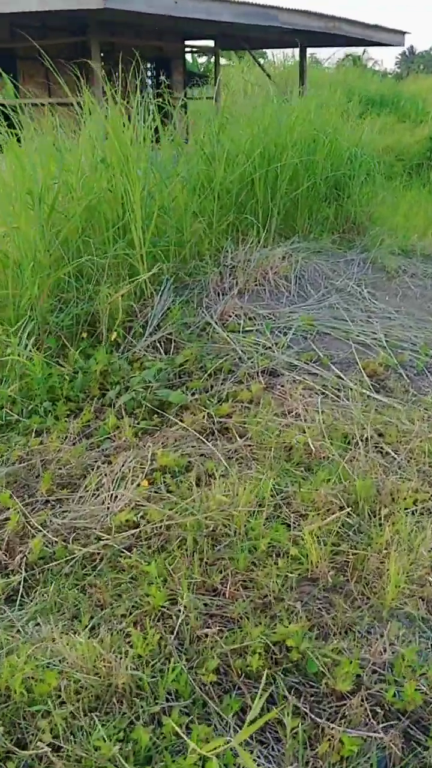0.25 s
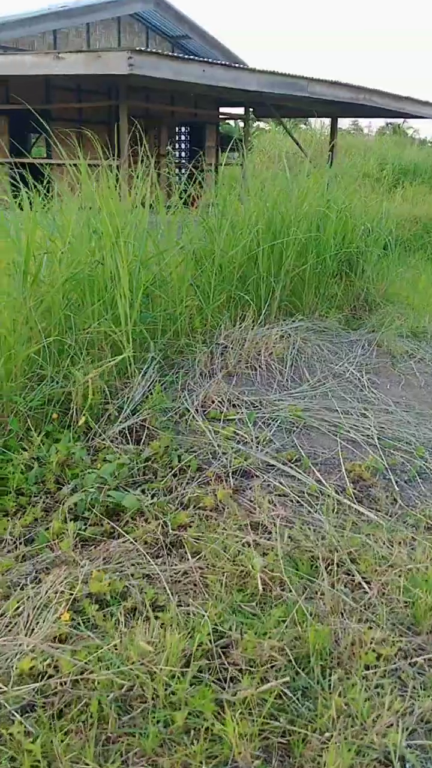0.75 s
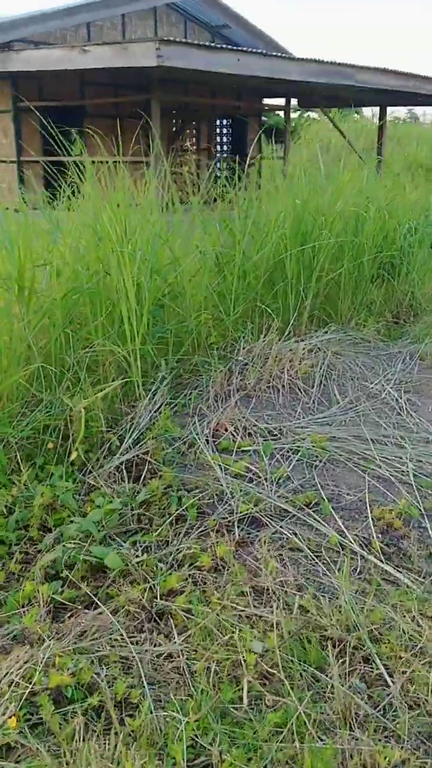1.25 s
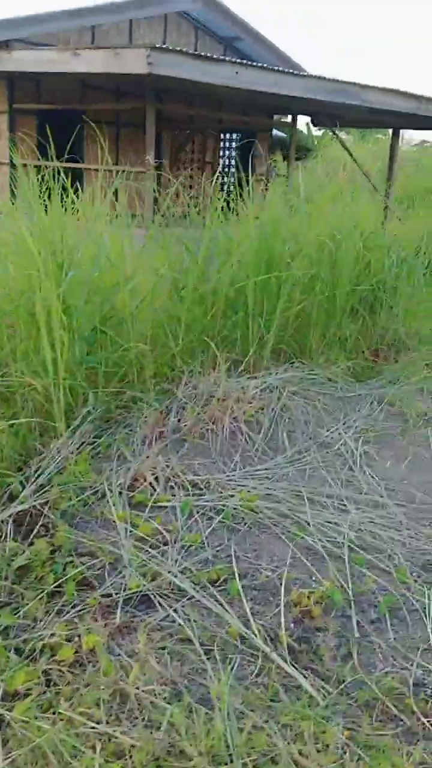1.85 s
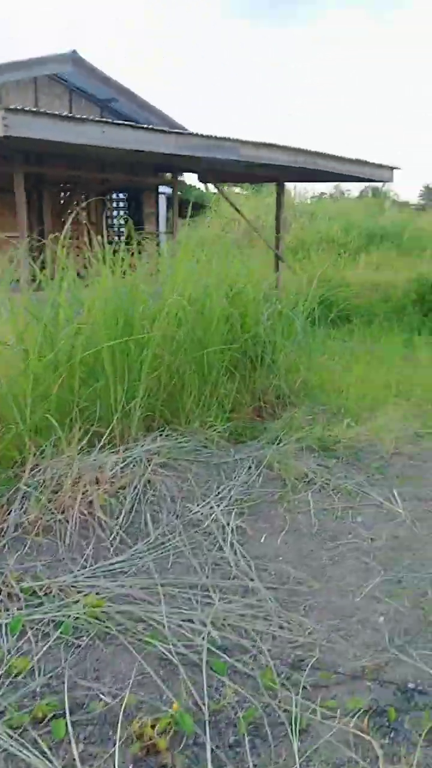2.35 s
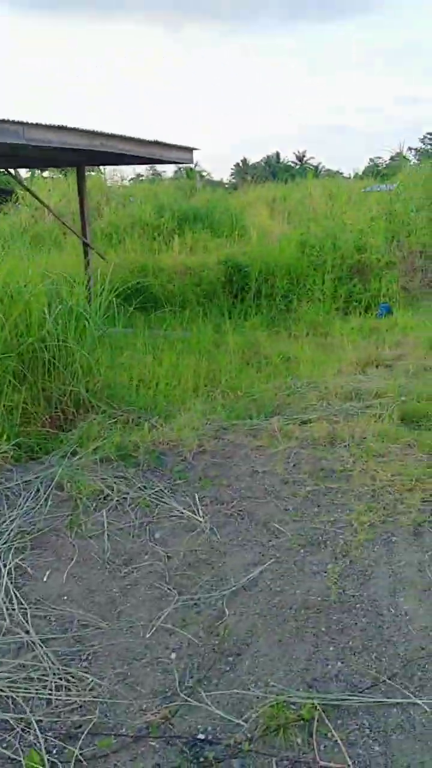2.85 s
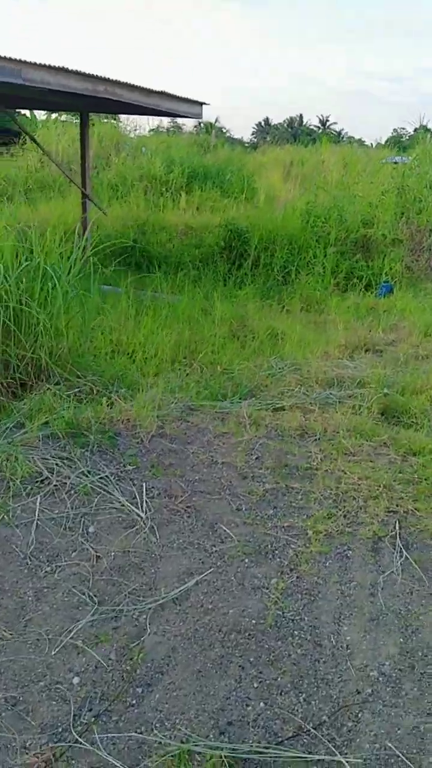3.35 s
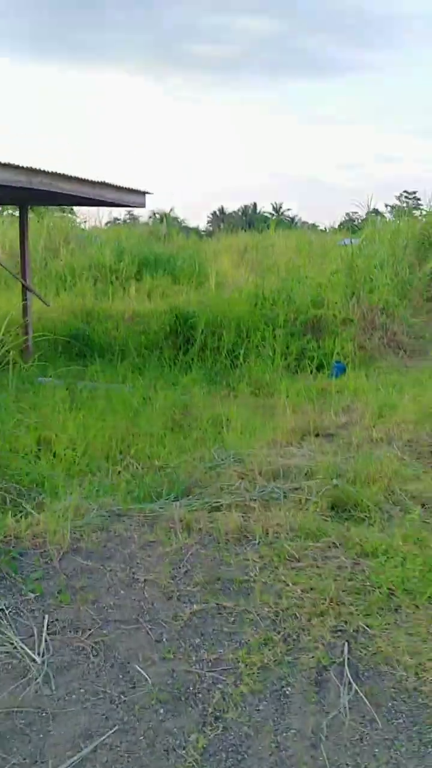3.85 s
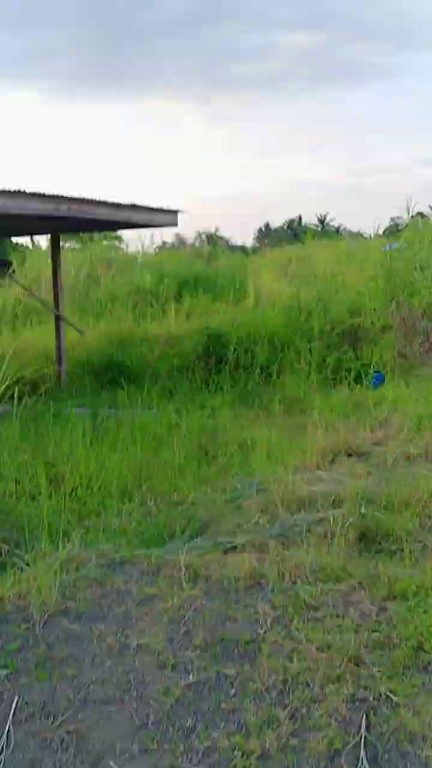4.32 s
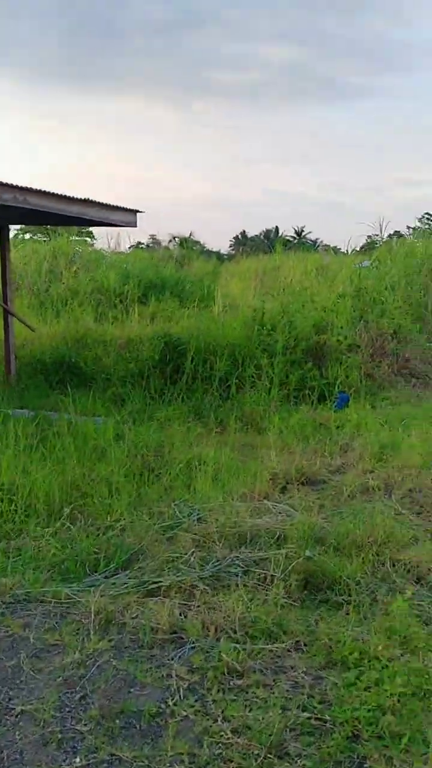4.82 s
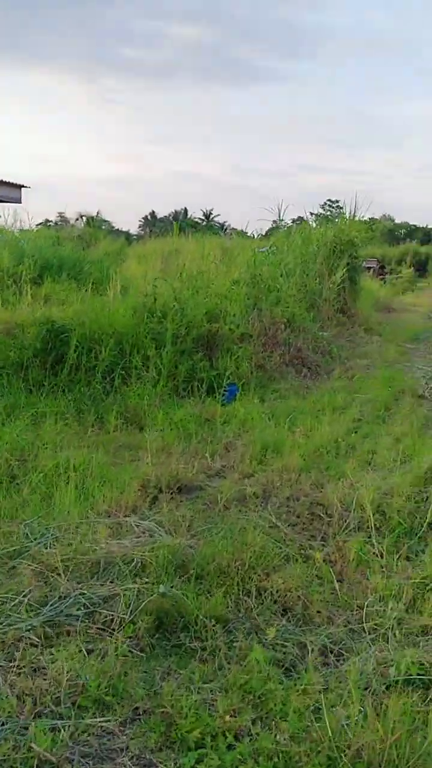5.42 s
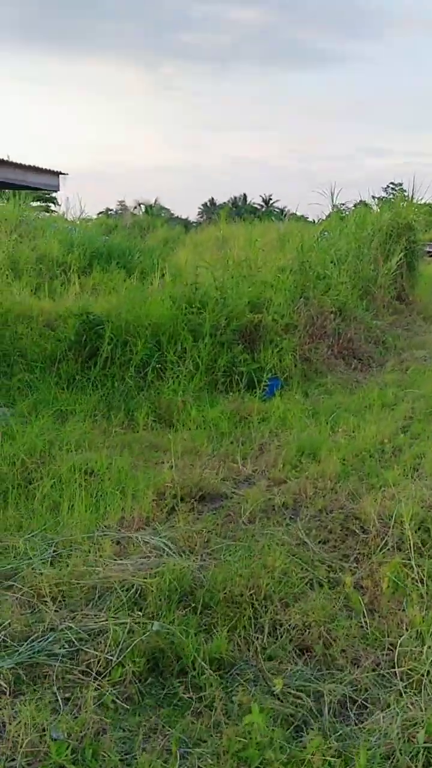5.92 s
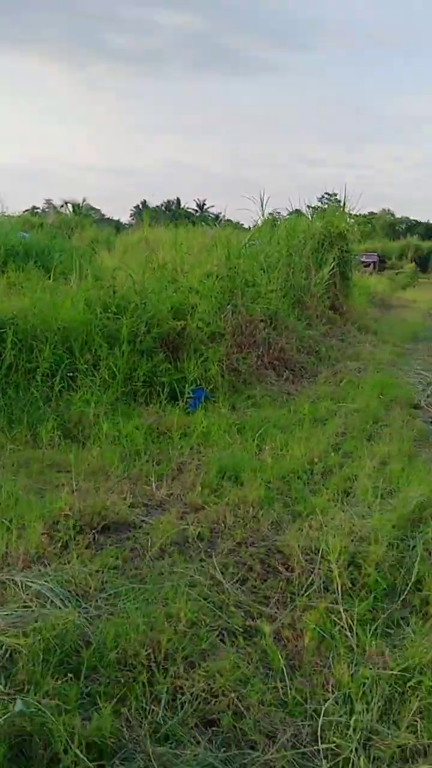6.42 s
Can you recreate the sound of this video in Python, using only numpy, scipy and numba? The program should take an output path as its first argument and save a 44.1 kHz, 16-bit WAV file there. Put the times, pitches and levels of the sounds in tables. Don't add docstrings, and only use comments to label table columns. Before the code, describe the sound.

A rural field heard through a handheld phone, with low uneven wind rumble, soft leaf hiss, high insect shimmer and a faint cricket trilling in bouts. Small birds whistle at the start. Around 0.9-1.2 s dry grass crunches and snaps, and a bright bird warble darts up and down. Far young roosters call from 1.1 to 1.9 s, with a fainter cry near 2.3. Steps crunch at 2.2 and 2.9; a heavy heel thuds at 3.1. From 3.5 to 5.1 s a near rooster crows loudly: rough rising start, shout, swelling cry, clear falling end. A deeper, farther rooster overlaps it, leaving a faint tail until about 6. Crunches at 3.7 and 4.3, another warble at 4.3, a thud at 4.75. A stick cracks sharply at 5.54, then light grass brushing and gliding whistles continue to the end at about 6.6 s.

```python
import sys
import numpy as np
from scipy import signal
from scipy.fft import rfft, irfft
from scipy.io import wavfile
from scipy.ndimage import uniform_filter1d
from numba import njit

SR = 44100
rng = np.random.default_rng(int(sys.argv[2]) if len(sys.argv) > 2 else 0)


def how_loud(loudness_db):
    steps = np.asarray(loudness_db, float) / 20
    return 10 ** steps


def dump_mix(stems):
    frames = np.atleast_2d(stems).T
    limited = np.clip(frames, -1, 1)
    pcm = np.round(limited * 32767).astype(np.int16)
    wavfile.write(sys.argv[1], SR, pcm)


N = 294147


@njit
def svf(x, hz, width):
    y, b, l = np.empty(len(x)), 0., 0.
    g, k = np.tan(np.pi * hz / SR), width / hz
    for i in range(len(x)):
        v = (b + g * (x[i] - l)) / (1 + g * (g + k))
        b, l, y[i] = 2 * v - b, l + 2 * g * v, k * v
    return y


def sharp_band(x, hz, width):
    return svf(svf(x, hz, width), hz, width)


def level(x, db):
    return x * how_loud(db) / np.sqrt(np.mean(x ** 2))


def walk(rate, size=N):
    k = int(SR / rate)
    held = np.repeat(rng.standard_normal(size // k + 1), k)
    return 1.114 * uniform_filter1d(uniform_filter1d(held, k), k)[:size]


def colour(x, tone):
    hz, db = np.transpose(tone)
    bins = np.arange(len(x) // 2 + 1) * SR / len(x) + 1
    return irfft(rfft(x) * how_loud(np.interp(np.log(bins), np.log(hz), db)), len(x))


def curve(table):
    return how_loud(np.interp(np.arange(N) / SR, *np.transpose(table)))


def add(out, start_s, x):
    i = max(int(start_s * SR), 0)
    out[i:i + len(x)] += x[:N - i]


def crow(syllables, tones_db, roughness, lowest):
    out = np.zeros(N)
    quaver, wobble, jitter = .034, .016, .026
    flutter_hz, rasp_db, breath_db, half_db = 80, -9, -15.5, -15
    for rows, tone_db, rough in zip(syllables, tones_db, roughness):
        s, *columns = np.transpose(rows)
        t = np.arange(s[0], s[-1], 1 / SR)
        size = len(t)
        hz, effort_db, *gape_db = (uniform_filter1d(np.interp(t, s, c), size=600) for c in columns)
        throb = np.sin(2 * np.pi * 39 * t + walk(12, size))
        unsteady = quaver * throb + wobble * walk(flutter_hz, size) + jitter * walk(500, size)
        phase = 2 * np.pi * np.cumsum(hz * (1 + rough * unsteady)) / SR
        upper_db = effort_db.max() + 0.65 * (effort_db - effort_db.max())
        breath = level(svf(rng.standard_normal(size), 3150, 900), 0)
        voice = rough * how_loud(upper_db + breath_db) * breath
        efforts_db = [effort_db - sum(gape_db), effort_db, upper_db, upper_db]
        for k, (db, part_db) in enumerate(zip(efforts_db, tone_db)):
            rasp = how_loud(rasp_db) * (lowest + k) * walk(700, size)
            shake = 0.8 * min(k, 1) * throb + 0.43 * walk(flutter_hz, size) + rasp
            flutter = (1 + rough * shake) / np.sqrt(1 + rough ** 2)
            voice = voice + np.sqrt(2) * how_loud(db + part_db) * flutter * np.sin((lowest + k) * phase)
        between = np.sin((lowest + .5) * phase) * .5 + np.sin((lowest + 1 + .5) * phase)
        voice = voice + rough * how_loud(upper_db + half_db) * between
        add(out, s[0], voice * np.clip(np.minimum(t - s[0], s[-1] - t) / 0.0013, 0, 1))
    return colour(out, [(520, -27), (720, 1), (3700, -3.0), (4700, -50)])


# t/s, f/Hz, effort level/dB, loss of the lowest tone by the open beak/dB
NEAR_CROW = [
    [(3.505, 676, -40.5, 3), (3.565, 830, -32, 4), (3.62, 881, -37, -2.5), (3.67, 812, -40.5, 4),
     (3.73, 777, -54, 20)],
    [(3.755, 804, -37.5, 3.5), (3.78, 990, -27.5, 3.5), (3.805, 995, -27, 1), (3.835, 967, -29.5, -0.5),
     (3.875, 765, -44, 4)],
    [(3.92, 670, -48.5, -7), (3.975, 880, -37, 3.5), (4.05, 888, -28.5, 5.5), (4.1, 932, -29.5, 0),
     (4.17, 970, -25.5, 7), (4.22, 902, -28.5, 2.5), (4.3, 850, -28.5, 9.5), (4.37, 754, -40.5, 4)],
    [(4.48, 788, -44, 14.5), (4.65, 818, -37.5, 8)],
    [(4.63, 834.4, -29.5, 25), (4.7, 820, -25.5, 18), (4.85, 814.7, -30, 17), (4.98, 806.4, -27, 23),
     (5.1, 783.4, -36.5, 9), (5.13, 750, -55, -4)],
]
NEAR_TONES = [(0, 0, -18, -17), (0, 0, -21, -26), (0, 0, -19, -21), (0, 0, -15, -14), (0, 0, -22, -21)]
NEAR_HOARSE = [.95, .45, .6, 1., .04]


def near_rooster():
    return crow(NEAR_CROW, NEAR_TONES, NEAR_HOARSE, lowest=1)


# t/s, f/Hz, effort level/dB
DEEP_CROW = [
    [(3.54, 583, -39), (3.59, 589, -37.5), (3.76, 574.6, -45.5)],
    [(3.86, 546, -40), (3.892, 567, -37.5), (4.03, 628, -46)],
    [(4.22, 505, -47), (4.3, 563.5, -35), (4.4, 591, -46), (4.52, 586.4, -42.5), (4.6, 585, -39),
     (4.65, 550, -47)],
    [(4.63, 535, -39.5), (4.7, 540, -47.5), (4.78, 550.4, -46.5), (4.87, 551, -42.5), (4.96, 539, -50),
     (5.08, 526, -60)],
    [(5.45, 513.3, -61.5), (5.564, 532, -54.5), (5.776, 606.6, -52), (6.03, 577, -83)],
]
DEEP_TONES = [(-1, 1, -9), (0, -2.5, -6.5), (1.5, 2.5, -13.5, -10), (-1, -4, -1.5, -22), (0.3, -3.5)]
DEEP_HOARSE = [.95, .75, .75, .2, .5]


def deep_rooster():
    return crow(DEEP_CROW, DEEP_TONES, DEEP_HOARSE, lowest=2)


# t/s, f/Hz, effort level/dB
FAR_CROWS = [
    [(1.13, 840, -44.5), (1.27, 872, -38), (1.33, 883, -47.5), (1.44, 1014, -62)],
    [(1.44, 689.7, -44.5), (1.484, 840, -38.5), (1.6, 916, -51.5)],
    [(1.592, 1126, -43.5), (1.63, 827, -51), (1.8, 812, -53), (1.88, 803, -66)],
    [(2.28, 849, -63), (2.394, 854, -57.5), (2.52, 839, -66)],
    [(1.33, 910, -52), (1.434, 1026, -52), (1.56, 908, -62)],
    [(5.17, 808, -62), (5.212, 842, -52), (5.26, 924, -62)],
]
FAR_TONES = [(-11.5, -1.5, 2), (-16.5, 0, -8.5), (2, -5.5), (2.5, -1.5), (1.5,), (1.5, -2)]
FAR_HOARSE = [.2, .55, .6, .5, .7, .6]


def far_roosters():
    return crow(FAR_CROWS, FAR_TONES, FAR_HOARSE, lowest=0.98)


def whistle(length, first, middle, last):
    u = np.linspace(-1, 1, int(length * SR))
    hz = middle + (last - first) / 2 * u + ((first + last) / 2 - middle) * u ** 2
    hz = hz * (1 + .006 * walk(200, len(u)))
    swell = (1 - u ** 4) * (1 + 0.45 * walk(185, len(u)))
    return np.sqrt(2) * swell * np.sin(2 * np.pi * np.cumsum(hz) / SR)


GLIDE_SHAPES = dict(arch=(1.0, .79), fall=(1.09, .89), dive=(1.28, .77), hook=(1.1, .98), rise=(.89, 1.03),
                climb=(.88, 1.14), hump=(.68, .84), flat=(1.0, .99))


def call_of(kind, length, hz, db):
    first, last = GLIDE_SHAPES[kind]
    return how_loud(db) * whistle(length, first * hz, hz, last * hz)


# start t/s, length t/s, middle f/Hz, level/dB
OPEN_WHISTLES = dict( arch=[(0., 0.084, 3500, -45.5), (0., 0.063, 1810, -55), (.289, 0.036, 2300, -51),
                 (5.662, 0.13, 3440, -47.5), (5.917, .12, 3468, -47.5), (6.191, .12, 3394, -47)],
                 fall=[(5.413, 0.13, 3167, -47)], hook=[(6.458, 0.06, 2040, -60.5),
                 (6.5, 0.085, 1257, -60.5)], climb=[(2.885, .013, 4750, -42), (1.165, 0.017, 13000, -47.5),
                 (1.4, 0.015, 5260, -62)], hump=[(.005, 0.085, 2776, -46), (1.166, 0.056, 2990, -33)],
                 flat=[(2.895, 0.018, 5330, -48.5), (1.193, 0.043, 480, -56), (1.446, 0.033, 2500, -37.5),
                 (1.476, 0.037, 2780, -44), (2.4, 0.36, 2900, -66)])
# start t/s, length t/s, middle f/Hz, level/dB
SHORT_PIPS = dict(rise=[(.718, 0.024, 1740, -58), (1.586, 0.021, 5300, -38.5), (1.643, 0.017, 4030, -46),
              (2.943, .022, 3900, -48), (3.433, 0.066, 2470, -59), (5.23, 0.043, 2500, -55.5),
              (5.36, 0.04, 2650, -54.5), (5.801, 0.039, 2270, -46), (6.012, 0.027, 2170, -43)])


def open_birds():
    out = np.zeros(N)
    for calls in (OPEN_WHISTLES, SHORT_PIPS):
        for kind, rows in calls.items():
            for start, length, hz, db in rows:
                add(out, start, call_of(kind, length, hz, db))
    return out


# start t/s, length t/s, middle f/Hz, level/dB
HIDDEN_WHISTLES = dict(fall=[(.323, .028, 2600, -53), (.574, .03, 4300, -58), (.636, .022, 3150, -58),
                   (1.955, .033, 3950, -59.5), (1.976, .038, 3280, -50), (2.01, .0184, 3200, -60),
                   (1.608, .014, 4750, -52), (4.606, .012, 4550, -56), (1.295, .04, 4950, -63)],
                   dive=[(.93, .04, 1150, -47), (.6, .043, 2950, -49), (3.17, .068, 3700, -60)],
                   rise=[(4.582, .022, 5150, -53), (4.644, .018, 4050, -53), (4.338, .025, 3550, -42),
                   (4.35, .02, 2800, -42), (1.35, .03, 5100, -63), (1.634, .012, 4500, -56),
                   (1.655, .02, 5000, -58), (2.955, .012, 4500, -58), (1.13, .015, 5600, -52),
                   (1.105, .02, 4500, -50)])


def hidden_birds():
    out, t = np.zeros(N), np.arange(SR // 10) / SR
    for kind, rows in HIDDEN_WHISTLES.items():
        for start, length, hz, db in rows:
            scatter = rng.standard_normal(len(t)) * np.exp(-t / .012)
            scatter /= np.sqrt(np.sum(scatter ** 2))
            add(out, start, signal.fftconvolve(call_of(kind, length, hz, db), scatter))
    return out


# t/s, f/Hz, level/dB
NEAR_WARBLE = [(1.102, 3640, -36), (1.123, 2800, -40), (1.138, 5350, -32.5), (1.152, 3370, -31),
               (1.157, 4120, -26), (1.167, 2720, -29.5), (1.189, 3670, -28), (1.21, 3950, -33),
               (1.222, 4400, -33.5), (1.232, 4300, -50)]
# t/s, f/Hz, level/dB
FAR_WARBLE = [(4.291, 4370, -46), (4.297, 5420, -44), (4.305, 5300, -45), (4.313, 3640, -40),
              (4.319, 4270, -34), (4.331, 2800, -39.5), (4.347, 3057, -36), (4.361, 3254, -35.5),
              (4.38, 2680, -36)]


def warbles():
    out = np.zeros(N)
    for rows in (NEAR_WARBLE, FAR_WARBLE):
        s, *columns = np.transpose(rows)
        t = np.arange(s[0], s[-1], 1 / SR)
        hz, db = (uniform_filter1d(np.interp(t, s, c), size=150) for c in columns)
        swell = signal.windows.tukey(len(t), .1) * (1 + 0.27 * walk(187, len(t)))
        phase = 2 * np.pi * np.cumsum(hz) / SR
        voice = np.sin(phase) + how_loud(-29) * np.sin(2 * phase)
        add(out, s[0], np.sqrt(2) * how_loud(db) * swell * voice)
    return out


def twitter(count=500):
    out = np.zeros(N)
    for when, long, pitch, bend, loud in rng.random((count, 5)):
        hz = 1900 + 1500 * pitch
        call = whistle(.015 + .035 * long, hz, hz * (.93 + .12 * bend), hz * (.8 + .3 * bend))
        add(out, when * N / SR, how_loud(-72 + 9 * loud) * call)
    return out


def grit(per_s, scatter_db):
    happens = rng.random(N) < per_s / SR
    size = how_loud(scatter_db * np.minimum(rng.exponential(size=N), 3.5))
    return happens * size * rng.standard_normal(N)


def smear(ticks):
    k = int(.0008 * SR)
    return uniform_filter1d(uniform_filter1d(np.abs(ticks), k), k) * rng.standard_normal(len(ticks))


# start t/s, length t/s, level/dB, centre f/Hz
FOOT_TREADS = [(0.894, 0.055, -39.5, 1980), (0.998, 0.015, -42.5, 2080), (1.067, 0.17, -38.5, 3380),
               (1.548, 0.22, -46, 2200), (2.08, 0.12, -47.5, 1840), (2.205, 0.081, -39, 2570),
               (2.296, 0.074, -50.5, 1790), (2.886, 0.1, -38, 2220), (3.093, 0.092, -45.5, 1400),
               (3.676, 0.061, -35.5, 3260), (4.268, 0.14, -33.5, 2700), (4.866, 0.17, -43, 1980),
               (5.493, 0.23, -45.5, 2570), (6.168, 0.15, -49.5, 2080)]


def treads():
    out, ticks = np.zeros(N), smear(grit(1500, 3.5) * how_loud(3.0 * walk(120)))
    for start, length, db, hz in FOOT_TREADS:
        crush = ticks[int(start * SR):int((start + length) * SR)]
        add(out, start, level(svf(crush, hz, hz), db) * signal.windows.tukey(len(crush), .7))
    return out


# t/s, peak level/dB, swell t/s, fade t/s [both over 20 dB]
LEG_STRIDES = [
    (0.929, -40, 0.039, 0.024),
    (1.67, -62.5, 4.8, 0.39),
    (2.15, -47, 0.082, 0.083),
    (2.24, -41.5, 0.037, 0.04),
    (2.93, -48, 0.056, 0.029),
    (3.7, -53, 0.031, 0.14),
    (4.05, -67, 0.4, 0.35),
    (4.36, -55.5, 0.79, 0.48),
    (4.91, -49, 0.099, 0.33),
    (5.66, -59, 0.58, 0.85),
]


def sweeps():
    t = np.arange(N) / SR
    gain = how_loud(-72.5)
    for s, db, swell, fade in LEG_STRIDES:
        gain = gain + how_loud(db - 20 * np.maximum((s - t) / swell, (t - s) / fade))
    return gain


# f/Hz, level/dB
BLADE_SIZES = [(2200, -3.5), (3600, -7.5), (5500, -5), (8000, -8.5), (11500, -5.5), (15000, 0)]


def blades():
    clusters = how_loud(3.5 * np.clip(walk(70), -2, 2))
    shared = grit(150, 3.0)
    brush = sum(how_loud(db) * svf(smear(shared + grit(500, 2.86)), hz, 0.47 * hz) for hz, db in BLADE_SIZES)
    return level(clusters * brush, 9.6) * sweeps()


# t/s, level/dB
GRASS_SNAPS = dict( blade=[(.9112, -15), (.9582, -29), (.9992, -31), (1.008, -25.5), (2.072, -37),
               (2.0993, -38), (2.1356, -25.5), (4.9683, -17.5), (4.5155, -37), (4.531, -31), (4.5784, -29),
               (4.7585, -35), (5.1571, -38), (5.2061, -27), (5.6401, -24), (5.6506, -24), (5.696, -24.5),
               (5.7711, -26), (5.8292, -30.5), (5.9004, -34.5)], stalk=[(1.359, -33.5), (1.6906, -26.5),
               (2.2325, -25), (2.2442, -26.5), (2.078, -38.5), (2.113, -39), (5.0433, -32), (5.0668, -40),
               (4.897, -33), (3.1248, -37), (3.688, -28.5), (3.719, -44), (4.0826, -32.5), (4.8249, -47),
               (4.8507, -26.5), (4.9111, -25), (5.019, -31), (5.1287, -37.5), (5.3979, -39),
               (6.2463, -36.5)], stem=[(2.638, -38), (2.9423, -24.5), (2.9794, -38), (2.9867, -36.5),
               (3.018, -24), (3.0244, -32.5), (3.0712, -40), (3.3287, -39), (3.361, -45), (6.1986, -31),
               (2.2385, -22.5), (2.2488, -21), (2.1005, -37), (2.268, -30.5), (2.897, -40), (3.003, -44),
               (3.704, -38), (3.723, -31), (4.93, -43), (4.986, -27.5)], twig=[(3.9385, -26),
               (4.336, -20.5), (5, -29), (4.5455, -34), (7.3, -32), (4.395, -45), (3.7, -41), (6.6, -38),
               (3.857, -40), (3.7, -39), (4.056, -43), (4.8, -46), (4, -46), (2.927, -34)])
# bright level/dB, dull level/dB [both against the snap], dull f/Hz
BREAK_TONES = dict(blade=(0.1, -18, 1750), stalk=(1.1, 0, 2200), stem=(-21, 0, 2700), twig=(-9, 0, 5200))


def snaps():
    out = np.zeros(N)
    t = np.abs(np.arange(400) / SR - .0006)
    for kind, rows in GRASS_SNAPS.items():
        bright_db, dull_db, dull_hz = BREAK_TONES[kind]
        for start, db in rows:
            crack = rng.standard_normal(len(t))
            bright = svf(crack * np.exp(-t / 0.0023), 9500, 9200)
            dull = svf(crack * np.exp(-t / 0.0011), dull_hz, 0.89 * dull_hz)
            add(out, start, how_loud(db + bright_db) * bright / np.abs(bright).max())
            add(out, start, how_loud(db + dull_db + 4.5) * dull / np.abs(dull).max())
    return out


# f/Hz, width f/Hz, level/dB
STICK_RINGS = [
    (3110, 490, 3),
    (5350, 1400, -2.5),
    (1400, 230, -37),
]


def stick():
    out = np.zeros(N)
    blow = np.exp(-((np.arange(400) / SR - .0006) / .00004) ** 2)
    ring = sum(how_loud(db) * svf(blow, hz, width) for hz, width, db in STICK_RINGS)
    add(out, 5.5415 - .0006, how_loud(-4.5) * ring / np.abs(ring).max())
    return out


# f/Hz, level/dB
MIC_TONE = [(60, 9), (3500, -2), (4200, -10.5), (5500, -8), (8000, -7), (9800, -16.5), (12000, -12),
            (15000, -6)]


def grass():
    return colour(treads() + blades() + snaps() + stick(), MIC_TONE)


# t/s, level/dB, f/Hz, time to fade by 60 dB t/s
HEEL_THUDS = [
    (0.494, -31, 150.7, 0.26),
    (0.763, -36.5, 136.4, 0.26),
    (2.703, -35.5, 154.4, 0.23),
    (3.075, -14, 120, 0.096),
    (3.513, -32, 216, 0.04),
    (4.754, -22, 118, 0.081),
    (6.289, -40.5, 250, 0.049),
    (6.597, -43, 177, 0.22),
]
# f/Hz, width f/Hz, level/dB
CASE_RATTLE = [
    (350, 320, -19),
    (950, 300, -24),
]


def heels():
    out, t = np.zeros(N), np.arange(SR // 4) / SR
    for start, db, hz, t60 in HEEL_THUDS:
        shake = rng.standard_normal(len(t))
        fade = (1 - np.exp(-t / 0.0007)) * np.exp(-np.log(1000) * t / t60)
        swing = fade * np.sin(2 * np.pi * hz * t)
        rattle = sum(level(sharp_band(shake, f, width), case_db) for f, width, case_db in CASE_RATTLE)
        add(out, start, how_loud(db) * (swing + rattle * np.exp(-t / 0.025)))
    return out


def jolts():
    t = np.arange(N) / SR
    return sum((t > s) * how_loud(db - 14 - 123 * np.abs(t - s)) for s, db, *_ in HEEL_THUDS)


# t/s, level/dB
BREEZE = [(0.0, -43.5), (.46, -36.5), (.95, -40), (1.39, -54), (1.47, -45), (1.97, -54.5), (2.36, -43.5),
          (2.62, -57.5), (2.77, -47.5), (3.03, -55), (3.27, -50), (4.1, -49.5), (4.28, -34.5), (4.4, -53.5),
          (4.89, -44.5), (5.29, -54.5), (6.45, -60), (6.67, -35.5)]
# f/Hz, level/dB [per Hz]
BREEZE_TONE = [(18, -67), (30, -39), (41, -29), (79, -2.5), (107, 5.5), (165, -0.5), (253, -14),
               (288, -18.5), (500, -39.5), (650, -46), (1100, -120)]


def wind():
    gusts = colour(rng.standard_normal(N) * how_loud(3.0 * walk(25)), BREEZE_TONE)
    return level(gusts, -2.77) * (curve(BREEZE) + np.minimum(jolts(), how_loud(-39)))


# f/Hz, level/dB [per Hz]
LEAF_TONE = [(120, 2.5), (200, 7.5), (254, 0), (473, -7), (791, -4.5), (1370, -7.5), (2510, -5.5),
             (3310, -9), (4120, -32.5), (6050, -63), (7970, -31), (9580, -42.5), (11300, -11.5),
             (12600, -52), (16000, -31)]


def leaves():
    return level(colour(rng.standard_normal(N) * how_loud(1.2 * walk(6.7)), LEAF_TONE), -54)


# f/Hz, width f/Hz, level/dB, throb rate [per s], throb depth [0-1]
CHOIRS = [
    (8176, 830, -66, 40, 0.2),
    (11640, 1300, -70.5, 66, 0.3),
    (7600, 98, -72, 87, 0),
]


def insects():
    out, t = np.zeros(N), np.arange(N) / SR
    for hz, width, db, throb, depth in CHOIRS:
        band = sharp_band(rng.standard_normal(N), hz, width)
        pulse = 1 + depth * np.sin(2 * np.pi * throb * t + 3 * walk(3.3))
        out += level(band * pulse * how_loud(1.0 * walk(1.76) + 2.5 * walk(25)), db)
    return out


# start t/s, end t/s, level/dB
CRICKET_BOUTS = [
    (.13, 1.6, -72),
    (2.1, 3.6, -74),
    (3.7, 4.45, -70.5),
    (5.1, 5.87, -70.5),
    (6.35, 6.8, -75),
]


def cricket():
    t = np.arange(N) / SR
    strokes = 1 + np.sin(2 * np.pi * 50 * t + walk(3.4))
    wing = sharp_band(strokes * rng.standard_normal(N), 6900, 260)
    gain = how_loud(-96)
    for start, end, db in CRICKET_BOUTS:
        gain = gain + how_loud(db) * np.clip(np.minimum(t - start, end - t) / 0.097 + .5, 0, 1)
    return level(wing, 0) * gain


def echoes(x, db, fade_s):
    t = np.arange(SR // 2) / SR
    tail = rng.standard_normal(len(t)) * np.exp(-t / fade_s)
    return signal.fftconvolve(x, tail * how_loud(db) / np.sqrt(np.sum(tail ** 2)))[:N]


def scene():
    crows = near_rooster() + deep_rooster() + far_roosters()
    song = open_birds() + hidden_birds() + warbles() + twitter()
    late = echoes(crows + how_loud(-5) * song, -11, .36 / np.log(1000))
    early = echoes(song, -7, .018)
    walker = grass() + heels() + wind()
    field = leaves() + insects() + cricket()
    return (crows + song + late + early + walker + field)[None]


def roll_off(x):
    return signal.sosfilt(signal.butter(12, 16920, fs=SR, output="sos"), x)


def record(dry):
    thin = signal.sosfilt(signal.butter(4, 70, "high", fs=SR, output="sos"), dry)
    cut = signal.sosfilt(signal.ellip(10, .3, 60, 15850, fs=SR, output="sos"), thin)
    return roll_off(cut)


dry = scene()
out = record(dry)
dump_mix(out)
```